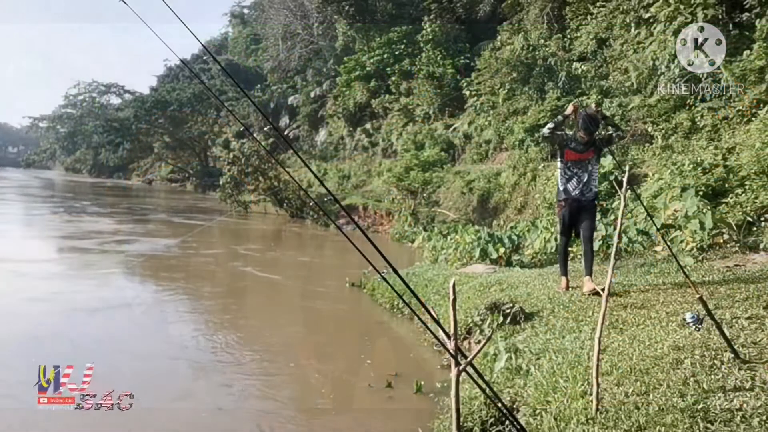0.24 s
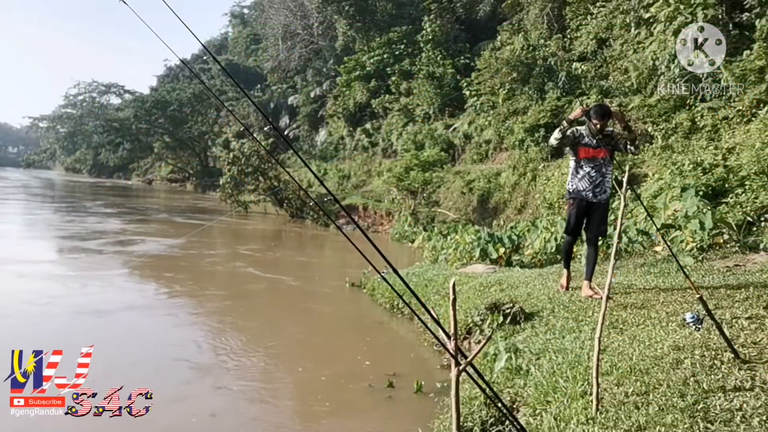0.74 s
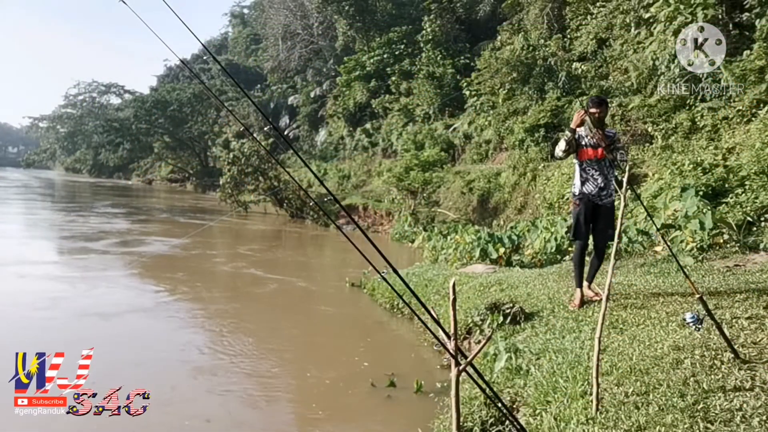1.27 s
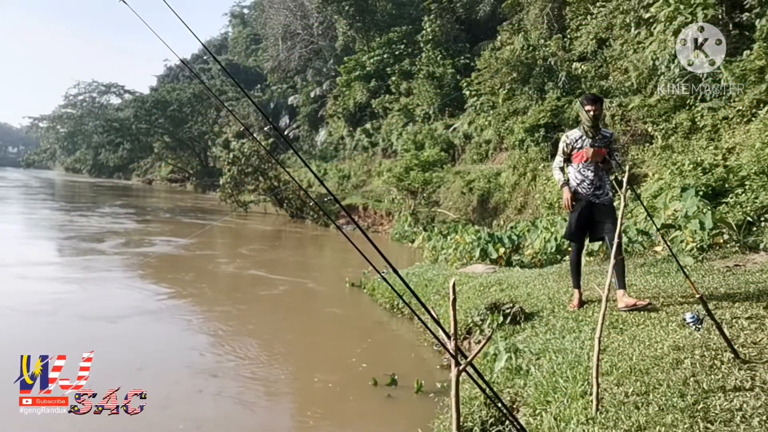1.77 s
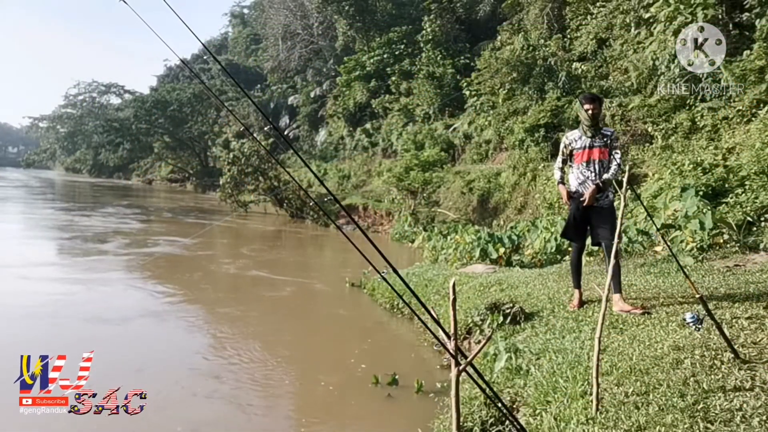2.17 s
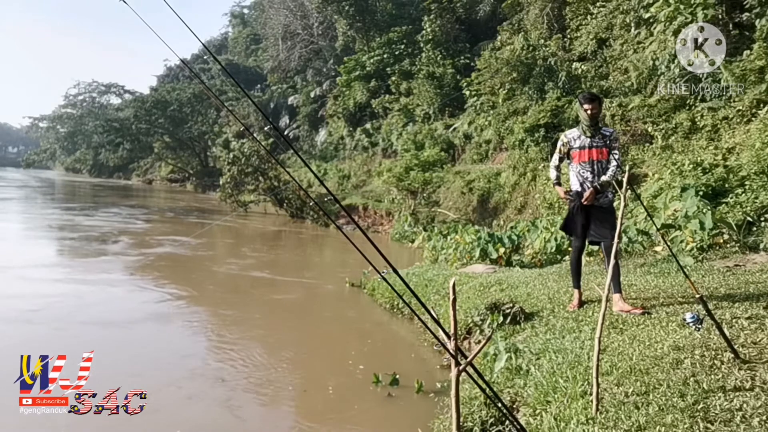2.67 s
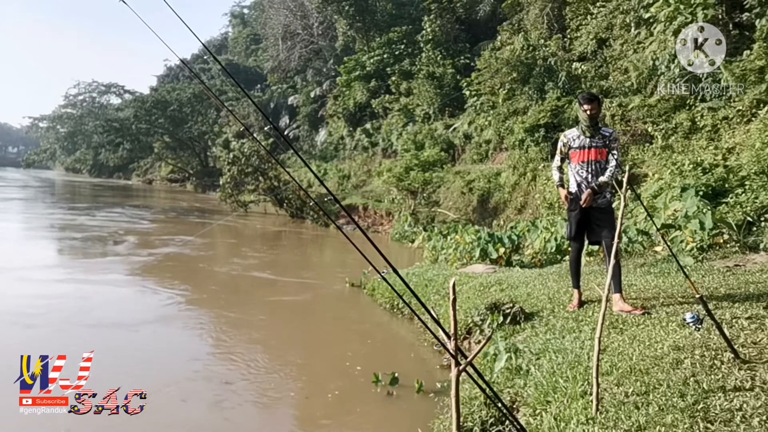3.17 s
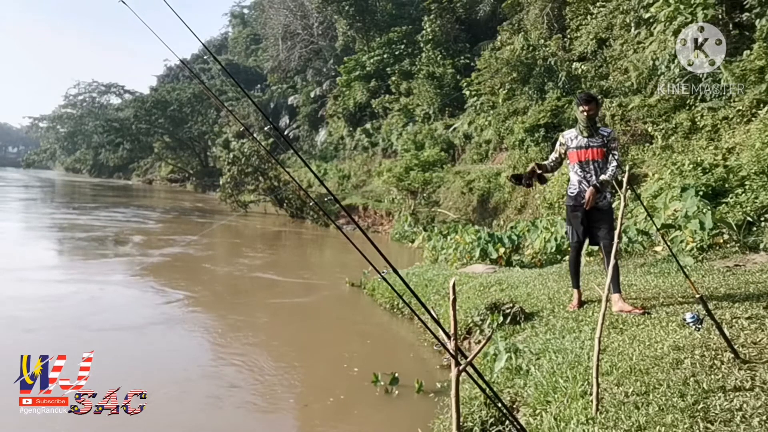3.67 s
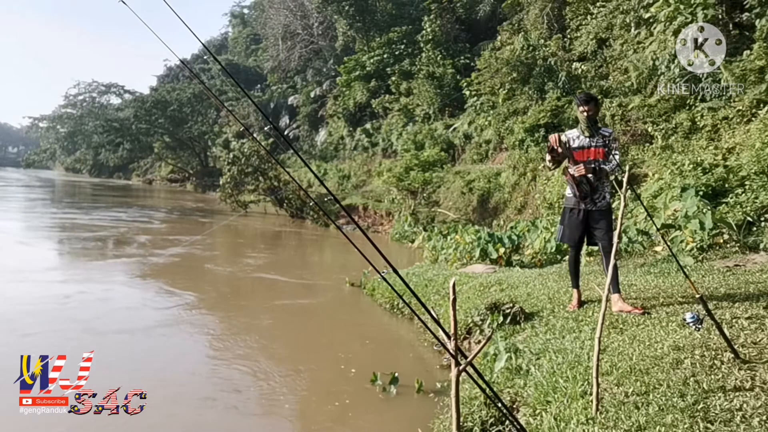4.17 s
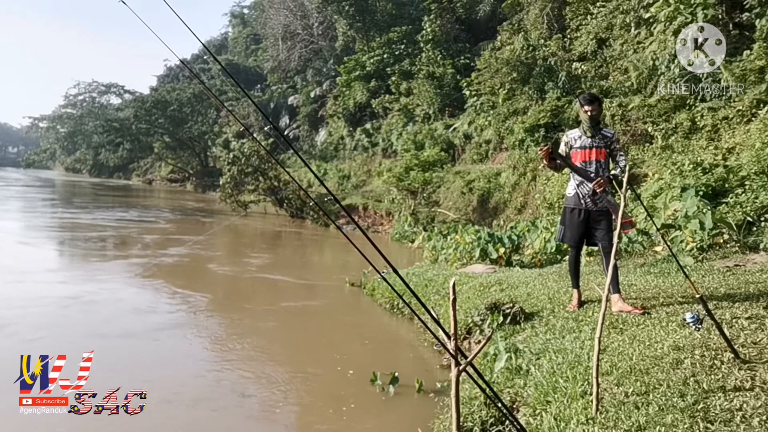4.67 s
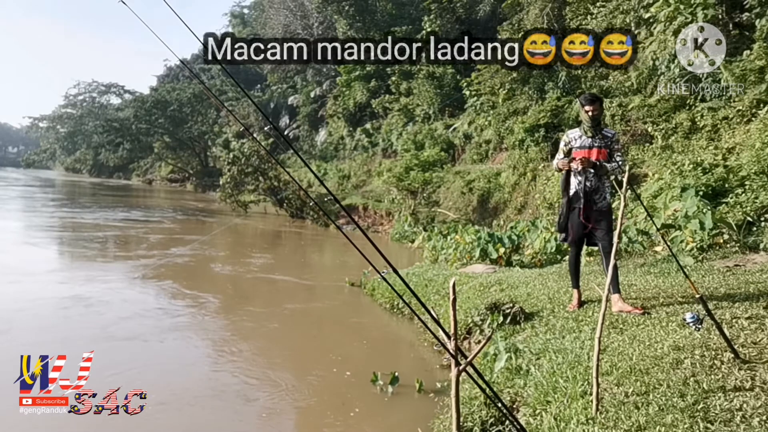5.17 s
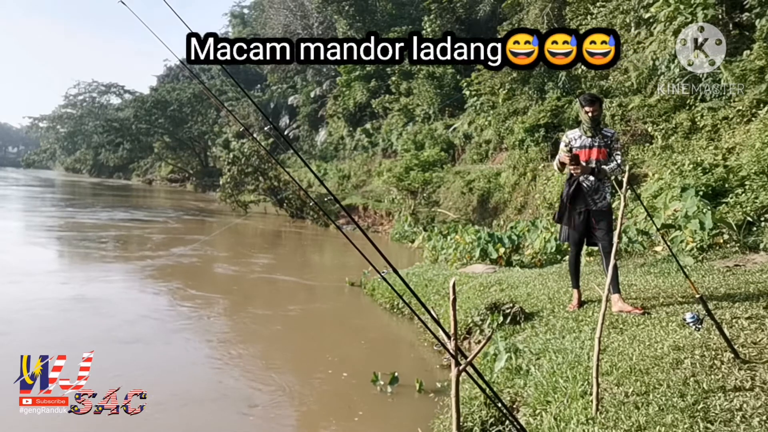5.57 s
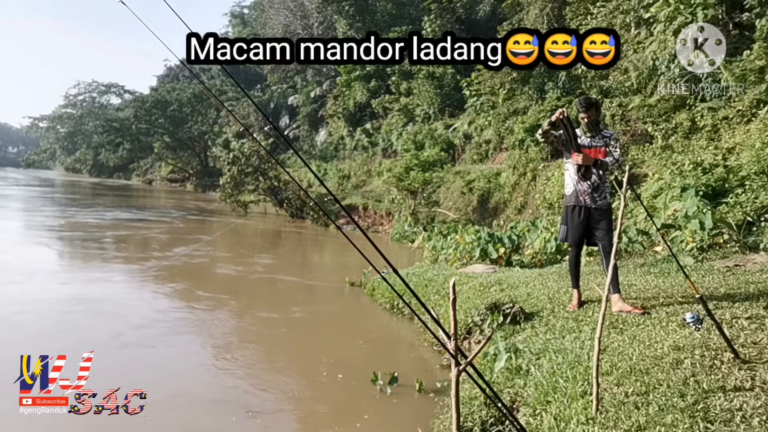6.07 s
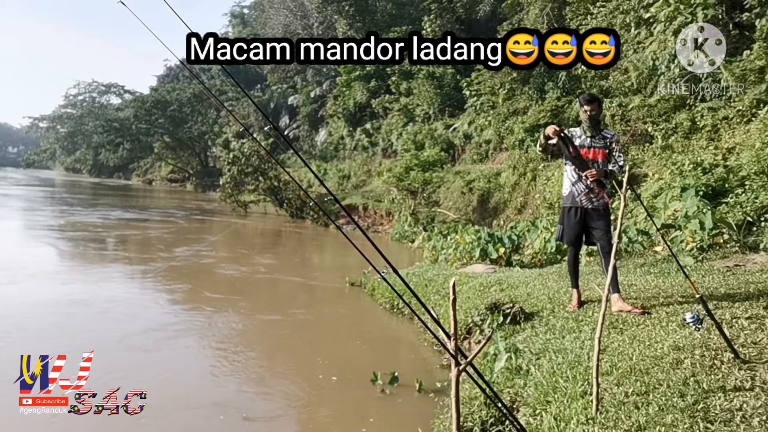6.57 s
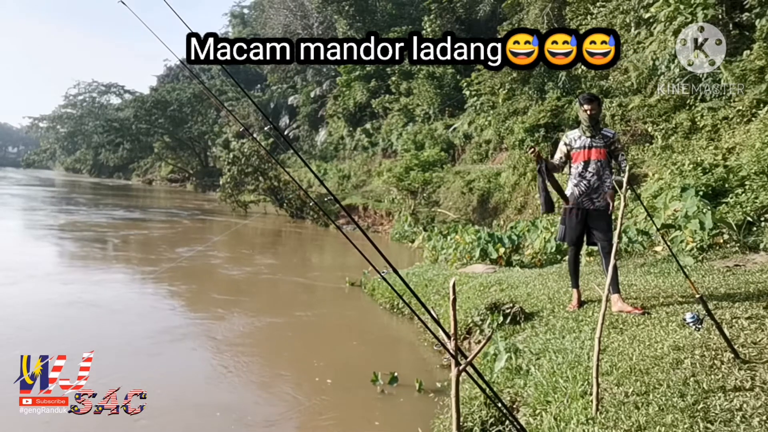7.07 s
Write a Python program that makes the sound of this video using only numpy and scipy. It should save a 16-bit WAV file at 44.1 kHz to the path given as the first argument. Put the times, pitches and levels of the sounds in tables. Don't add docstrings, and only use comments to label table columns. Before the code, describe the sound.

Outdoors on a wooded river bank, hundreds of cicadas make a continuous bright, flickering hiss, with one nearer buzzer and small regular ticks on the right. A distant engine drones low and unsteadily on the left over rumble and soft water wash. Faint hoots come early; a small bird gives a rapid falling trill near three seconds and again at the end. Wide stereo, quick fade-in.

```python
import sys
import numpy as np
from scipy import signal
from scipy.fft import rfft, irfft, next_fast_len
from scipy.io import wavfile
from scipy.ndimage import uniform_filter1d

SR = 44100
rng = np.random.default_rng(int(sys.argv[2]) if len(sys.argv) > 2 else 0)


def dump(signal):
    limited = np.clip(np.atleast_2d(signal).T, -1, 1)
    pcm = np.round(limited * 32767).astype(np.int16)
    wavfile.write(sys.argv[1], SR, pcm)


def gain_from_db(level_db):
    decades = np.asarray(level_db, float) / 20
    return 10 ** decades


N = 322812
TIME = np.arange(N) / SR

# frequency in Hz, density in dB per Hz.
CHORUS_SPECTRUM = [(5200, -38), (5600, -29.5), (5900, -16.5), (6200, -7), (6500, -4), (6900, -4.5),
                   (7300, -3), (7800, 0.5), (8100, -13), (8500, -14), (8950, -19.5), (9300, -21.5),
                   (10000, -25), (11200, -37.5)]
OVERTONE_SPECTRUM = [(11200, -31), (12200, -5), (12700, -8), (13400, 0), (14300, -8), (15000, -11),
                     (15600, -6)]
WATER_SPECTRUM = [(150, -15), (220, -2.5), (320, -6), (700, -9.5), (1800, -15), (2800, -17), (3030, -17),
                  (3350, -20), (4250, -16.5), (4480, -10.5), (4800, -13), (5150, -19.5), (5700, -19.5),
                  (6500, -50)]
RUMBLE_SPECTRUM = [(20, -15.5), (40, -1.5), (65, -5.5), (100, 4.5), (140, 5.5), (190, -6.5), (260, -21),
                   (400, -31.5), (600, -53)]
TYRE_SPECTRUM = [(280, -36), (350, -1.5), (520, -2), (750, -7), (1000, -10.5), (1500, -13), (2200, -20.5)]
# frequency in Hz, left-right likeness from 0 to 1.
LIKENESS = [(25, .8), (60, .93), (200, .8), (500, .4), (1200, .25), (3000, .1), (7000, .1), (14000, .03)]
# frequency in Hz, left minus right in dB.
BALANCE_DB = [(60, 1), (250, 2), (1000, 1), (3000, .5), (4500, -1.5), (6400, -4), (8000, -4.5), (9500, -3),
              (13000, -9.5)]
# time in seconds, rate in Hz.
ENGINE_RATE = [(0, 42.1), (.55, 43), (1.35, 45.86), (1.75, 40.46), (1.95, 44.4), (2.2, 41.8), (2.57, 39.27),
               (2.95, 40.46), (3.42, 40.24), (3.65, 42), (3.85, 39.57), (4.05, 41), (4.35, 37.96),
               (4.8, 42.23), (5.15, 39.8), (5.9, 42.73), (6.8, 38.88), (7.1, 41.94)]
# start in seconds, length in seconds, level in dB.
ENGINE_BOOMS = [(0, 0.052, -50.5), (.24, 0.08, -52), (.48, 0.83, -45.5), (1.5, 0.16, -50.5),
                (1.72, .15, -45.5), (1.93, .25, -48.5), (2.3, 0.193, -50.5), (2.55, .38, -40.5),
                (3.07, .35, -41), (3.6, 0.1203, -43.5), (3.79, 0.11, -39.5), (3.99, 0.13, -47),
                (4.23, 0.26, -40), (4.5, 0.105, -48.5), (4.79, .19, -45), (5.03, .17, -46),
                (5.4, 0.25, -51.5), (5.69, 0.73, -47), (6.68, .22, -54), (7.03, 0.28, -49.5)]
# start in seconds, length in seconds, change in dB.
ENGINE_DROPOUTS = [
    (.52, 0.31, -7),
    (1.5, 0.13, -30),
    (1.77, 0.037, -12),
    (2.48, 0.26, -11),
    (3.6, 0.071, -2),
    (3.9, 0.056, -8),
    (4.14, 0.32, -7),
    (5.05, 0.17, -4),
]
# start in seconds, length in seconds, level in dB.
ENGINE_GUSTS = [
    (2.2, .3, -79),
    (2.6, .35, -60),
    (3.1, 0.31, -52),
    (3.75, .3, -53.5),
    (4.4, 0.32, -56.5),
    (5.0, .3, -65),
    (5.55, 0.28, -58.5),
    (6.45, 0.5, -56),
]
# first centre in seconds, bursts, spacing in seconds, level in dB.
BUSH_HIGH_RUNS = [
    (.035, 2, .4, -68),
    (1.02, 8, .233, -67),
    (2.934, 2, .26, -64.5),
    (3.895, 7, .229, -66.5),
    (6.41, 5, .22, -68),
]
# first centre in seconds, bursts, spacing in seconds, level in dB.
BUSH_LOW_RUNS = [
    (1.5, 7, .203, -61),
]
# start in seconds, length in seconds, level at the end in dB.
CRICKET_BOUTS = [
    (.1, 0.65, -71.5),
    (1.4, 0.31, -71),
    (1.75, .7, -68.5),
    (2.45, 0.74, -69),
    (4.2, 0.31, -72),
    (4.5, 0.69, -69.5),
    (6.0, 0.27, -81),
    (6.35, 0.29, -70),
    (6.9, .3, -84),
]
# time in seconds, level in dB.
TICKS = [(0.132, -44), (0.328, -45), (0.551, -40), (0.798, -38.5), (1.013, -41), (1.259, -41), (1.506, -38),
         (1.8, -41), (2.042, -40), (2.262, -40.5), (2.49, -44), (2.683, -41), (2.867, -42), (3.1, -36),
         (3.341, -38), (3.611, -45), (3.801, -38.5), (4.04, -39), (4.244, -39), (4.761, -39), (5.002, -41),
         (5.204, -44), (5.407, -38.5), (5.632, -38.5), (6.107, -41), (6.304, -40.5), (6.501, -42.5),
         (6.716, -39), (6.938, -40), (7.152, -40.5)]
# time of the peak in seconds, level in dB.
RASPS = [
    (0.87, -65.5),
    (1.646, -67),
    (2.378, -64),
    (3.132, -65),
    (3.932, -68),
    (5.133, -69),
    (6.249, -66.5),
    (7.118, -63.5),
]
# centre in seconds, level in dB, pitch in Hz.
HOOTS = [(1.179, -64.5, 463), (1.396, -63.5, 423), (1.568, -74, 423), (1.78, -65.5, 389), (1.872, -63, 396),
         (1.967, -61, 393), (2.137, -60.5, 390.0), (2.387, -62, 395), (2.607, -66, 391.4),
         (2.878, -65, 377), (3.011, -70, 392.7), (3.188, -72, 391.2), (4.36, -72, 412), (5.971, -69, 423.7)]
# time in seconds, level in dB, fall in dB per second.
PASSES = [
    (1.45, -64.5, 25),
    (2.4, -70.5, 16),
    (6.15, -76, 27),
]
# time in seconds, level in dB, top in Hz, bottom in Hz.
BIRD_NOTES = [
    (2.655, -60, 2700, 1800),
    (2.931, -51.5, 2750, 1910),
    (3.064, -47.5, 2880, 1891),
    (3.184, -51.5, 2900, 1844),
    (3.319, -48, 2900, 1910),
    (3.446, -47.5, 2900, 2004),
    (6.578, -57.5, 2850, 2007),
    (6.909, -56, 2750, 1825),
    (7.059, -50, 2750, 1900),
    (7.203, -49.5, 2800, 1932),
]
# delay in seconds, left in dB, right in dB.
TRUNK_ECHOES = [
    (.005, -4, -11),
    (.026, -13.5, -11),
    (.049, -29, -16),
    (0.102, -13, -19),
]

FADE_S, FADE_DB = 0.64, -7.5
EDGE_S = .04
CHORUS_DB, OVERTONE_DB, WATER_DB, RUMBLE_DB = -51, -83.5, -67, -54
FIRST_RE_SECOND_DB, SECOND_DB, IDLE_THIRD_DB, IDLE_FOURTH_DB, FIFTH_DB = -49, -52.5, -60.5, -70.5, -71.5
BUZZER_DB, BUZZER_SAG_DB_PER_S = -57, -0.27
WHINE_HZ, WHINE_DB = 3045, -82
BUSH_HIGH_HZ, BUSH_LOW_HZ, WARM_UP_DB = 8655, 8230, -4
BOUT_SWELL_DB, CRICKET_REST_DB = 8, -80
TICK_HZ, TICK_SPREAD_HZ = 7390, 18
RASP_S, RASP_LOW_HZ, RASP_HIGH_HZ, RASP_SWELL_DB = .12, 4800, 5080, 3
DRIP_S, DRIP_DB, DRIP_HZ = 2.147, -61.5, 1360
LEAVES_S, LEAVES_DB, LEAVES_RISE_DB_PER_S, LEAVES_FALL_DB_PER_S = 4.87, -65.5, 45, 250


def rms_one(x):
    return x / np.sqrt(np.mean(x ** 2) + 1e-20)


def at_hz(points, hz):
    point_hz, value = np.transpose(points)
    return np.interp(np.log(hz), np.log(point_hz), value)


def drift(rate_hz):
    step = 40
    r = np.exp(-2 * np.pi * rate_hz * step / SR)
    chance = rng.standard_normal(N // step + 2002)
    slow = signal.lfilter([1], [1, -2 * r, r * r], chance)[2000:]
    return np.interp(np.arange(N) / step, np.arange(len(slow)), rms_one(slow))


def phase(hz):
    return 2 * np.pi * np.cumsum(hz) / SR


def resonate(x, hz, width_hz):
    r = np.exp(-np.pi * width_hz / SR)
    zeros = [(1 - r * r) / 2, 0, (r * r - 1) / 2]
    poles = [1, -2 * r * np.cos(2 * np.pi * hz / SR), r * r]
    return signal.lfilter(zeros, poles, x + 1e-18)


def held(rows, rest_db, swell_db=0):
    t = TIME[::64]
    out = np.full(len(t), float(rest_db))
    for s, length, level_db in rows:
        on = np.interp(t - s, [-EDGE_S, 0, length, length + EDGE_S], [0, 1, 1, 0])
        still_to_swell = swell_db * np.clip(1 - (t - s) / length, 0, 1)
        raised = out + on * (level_db - rest_db - still_to_swell)
        out = np.where(on > 0, np.minimum(raised, max(level_db, rest_db)), out)
    return np.interp(TIME, t, out)


def fade_db():
    return FADE_DB * np.clip(1 - TIME / FADE_S, 0, 1)


def pulses(per_s, sharp, wander):
    return (.5 - .5 * np.cos(phase(per_s * (1 + wander * drift(2.2))))) ** sharp


def bursts(rows, length_s, wobble_hz, rise_hz):
    out = np.zeros(N)
    tremble = np.cumsum(wobble_hz * drift(61.4)) / SR
    for s, level_db, hz in rows:
        first = max(round((s - length_s / 2) * SR), 0)
        span = slice(first, round((s + length_s / 2) * SR))
        age = TIME[span] - s
        turn = hz * age + rise_hz * age ** 2 / (2 * length_s) + tremble[span]
        swell = np.cos(np.pi * age / length_s) ** 2
        out[span] += gain_from_db(level_db + 3) * swell * np.sin(2 * np.pi * turn)
    return out


def runs(rows, hz, spread_hz):
    out = []
    for s, many, gap_s, level_db in rows:
        for k in range(round(many)):
            out.append((s + k * gap_s, level_db + WARM_UP_DB / (1 + k) ** 2, hz))
    return np.array(out) + rng.standard_normal((len(out), 3)) * [.008, .7, spread_hz]


def place(x, pan_db, lag, wet_db, t60):
    age = np.arange(int(.35 * SR)) / SR
    sparse = rng.random((2, len(age))) < .02
    echoes = rng.standard_normal((2, len(age))) * gain_from_db(-60 * age / t60) * sparse * (age > .004)
    echoes = echoes / np.sqrt(np.sum(echoes ** 2, axis=1))[:, None]
    direct = np.array([x, np.interp(np.arange(N) - lag, np.arange(N), x)])
    wet = signal.oaconvolve(x[None], echoes, axes=1)[:, :N]
    return (direct + gain_from_db(wet_db) * wet) * gain_from_db(pan_db * np.array([[.5], [-.5]]))


def crowd(spectrum, count, patchy_db, rate_hz, lag):
    size = next_fast_len(N)
    hz = np.arange(1, size // 2 + 2) * SR / size
    low_hz, high_hz = spectrum[0][0], spectrum[-1][0]
    alike = np.clip(at_hz(LIKENESS, hz), 0, 1)
    shared, left, right = rfft(rng.standard_normal((3, size)))
    own = np.sqrt(1 - alike) * np.array([left, right])
    delay = np.array([hz ** 0, np.exp(-2j * np.pi * hz * lag / SR)])
    common = np.sqrt(alike) * shared * delay
    tilt = gain_from_db(at_hz(BALANCE_DB, hz) * np.array([[.5], [-.5]]))
    inside = (hz > low_hz) & (hz < high_hz)
    coloured = (own + common) * tilt * gain_from_db(at_hz(spectrum, hz)) * inside
    position = np.interp(np.log(hz), np.log([low_hz, high_hz]), [0, count - 1])
    out = np.zeros((2, N))
    for k in range(count):
        band = irfft(coloured * np.clip(1 - abs(position - k), 0, 1), size)[:, :N]
        out += band * gain_from_db(patchy_db * drift(rate_hz))
    return out / np.sqrt(np.mean(out.mean(axis=0) ** 2))


def cicada_chorus():
    voices = gain_from_db(CHORUS_DB) * crowd(CHORUS_SPECTRUM, count=5, patchy_db=0.97, rate_hz=97, lag=-30)
    overtone = gain_from_db(OVERTONE_DB) * crowd(OVERTONE_SPECTRUM, count=2, patchy_db=1.3, rate_hz=14, lag=-10)
    return gain_from_db(fade_db()) * (voices + overtone)


def water():
    return gain_from_db(WATER_DB + fade_db()) * crowd(WATER_SPECTRUM, count=4, patchy_db=.9, rate_hz=4.3, lag=15)


def rumble():
    return gain_from_db(RUMBLE_DB + fade_db()) * crowd(RUMBLE_SPECTRUM, count=2, patchy_db=0.0, rate_hz=1.9, lag=35)


def engine():
    rate_s, rate_hz = np.transpose(ENGINE_RATE)
    turn = phase(np.interp(TIME, rate_s, rate_hz))
    second_db = SECOND_DB + fade_db() + held(ENGINE_DROPOUTS, 0)
    third_db = held(ENGINE_BOOMS, IDLE_THIRD_DB, swell_db=1.5)
    fourth_db = held(ENGINE_GUSTS, IDLE_FOURTH_DB)
    orders_db = [second_db + FIRST_RE_SECOND_DB, second_db, third_db, fourth_db, FIFTH_DB]
    out = np.zeros(N)
    for order, level_db in enumerate(orders_db, 1):
        shiver = gain_from_db(level_db + 2.5 + 1.4 * drift(10))
        out += shiver * np.sin(order * turn + 0.23 * drift(8.9))
    return out


def buzzer():
    strokes = pulses(108.0, sharp=1.6, wander=0.001)
    weak = 0.15 * np.roll(strokes, round(SR / 216))
    puffs = (strokes + weak) * rng.standard_normal(N)
    body = resonate(resonate(puffs, 7440, 550), 7807, 380)
    level_db = BUZZER_DB + BUZZER_SAG_DB_PER_S * TIME + fade_db() + 0.57 * drift(6.6)
    return gain_from_db(level_db) * rms_one(body)


def whine():
    thin = resonate(resonate(rng.standard_normal((2, N)), WHINE_HZ, 90), WHINE_HZ, 90)
    return gain_from_db(WHINE_DB + fade_db() + 2.1 * drift(2.6)) * rms_one(thin)


def bush_crickets():
    upper = runs(BUSH_HIGH_RUNS, BUSH_HIGH_HZ, spread_hz=12)
    both_modes = np.vstack([upper, upper - [0, 6, 230]])
    high = bursts(both_modes, length_s=0.19, wobble_hz=35, rise_hz=0)
    high = high * pulses(65, sharp=0.37, wander=0.021)
    lower = runs(BUSH_LOW_RUNS, BUSH_LOW_HZ, spread_hz=22)
    low = bursts(lower, length_s=0.32, wobble_hz=58.6, rise_hz=0)
    low = low * pulses(76, sharp=1.2, wander=0.021)
    return gain_from_db(10) * high + gain_from_db(3.5) * low


def cricket():
    turn = phase(18.6 * (1 + 0.024 * drift(1.0)))
    chirp = 0.2 + (.5 - .5 * np.cos(turn)) ** 0.77
    strokes = 0.57 + (.5 + .5 * np.cos(3 * turn - 3 * np.pi)) ** 1.1
    tone = np.sin(phase(4670 + 25 * drift(25.4)))
    blur = rms_one(resonate(resonate(rng.standard_normal(N), 4740, 170), 4660, 180))
    level_db = held(CRICKET_BOUTS, CRICKET_REST_DB, BOUT_SWELL_DB) - 2 + 1.2 * drift(12)
    return gain_from_db(level_db) * rms_one(chirp * strokes * (tone + .5 * blur))


def ticker():
    rows = np.c_[TICKS, TICK_HZ + TICK_SPREAD_HZ * rng.standard_normal(len(TICKS))]
    return gain_from_db(-6) * bursts(rows, length_s=.014, wobble_hz=40, rise_hz=500)


def rasps():
    teeth = (.45 + pulses(85, sharp=2.0, wander=.08)) * rng.standard_normal(N)
    t = TIME[::64]
    swell = sum(gain_from_db(level_db) * np.interp(t - s, [-.09, 0, .04], [0, 1, 0]) for s, level_db in RASPS)
    out = np.zeros(N)
    for climb in np.arange(4) / 3:
        hz = RASP_LOW_HZ + climb * (RASP_HIGH_HZ - RASP_LOW_HZ)
        late = np.interp(TIME - RASP_S * (climb - .75), t, swell)
        band = rms_one(resonate(resonate(teeth, hz, 300), hz, 280))
        out += late * gain_from_db(-RASP_SWELL_DB * (1 - climb)) * band
    return gain_from_db(-3.5) * out


def hooting_bird():
    return gain_from_db(-2) * bursts(HOOTS, length_s=0.088, wobble_hz=11, rise_hz=-11)


def traffic():
    swell = sum(gain_from_db(level_db - fall * abs(TIME - s)) for s, level_db, fall in PASSES)
    return swell * crowd(TYRE_SPECTRUM, count=3, patchy_db=3.0, rate_hz=1.9, lag=8.7)


def drip():
    puff = gain_from_db(DRIP_DB) * np.interp(TIME - DRIP_S, [-.006, 0, .014], [0, 1, 0])
    return puff * rms_one(resonate(resonate(rng.standard_normal(N), DRIP_HZ, 700), DRIP_HZ, 700))


def trilling_bird():
    out = np.zeros(N)
    rough_hz, flutter = 75 * drift(200), gain_from_db(3.2 * drift(130))
    for s, level_db, top_hz, bottom_hz in BIRD_NOTES:
        span = slice(round((s - .03) * SR), round((s + .04) * SR))
        age = TIME[span] - s
        swing = np.interp(age, [-.02, -.011, -.006, 0, .009, .015, .028], [.45, .97, .85, .52, .1, 0, .3])
        swing = uniform_filter1d(swing, size=90)
        pitch_hz = bottom_hz + (top_hz - bottom_hz) * swing + rough_hz[span]
        shape = np.interp(age, [-.022, -.016, -.006, 0, .006, .016, .032], [0, .35, .55, 1, .5, .5, 0])
        out[span] += gain_from_db(level_db + 0.5) * shape * flutter[span] * np.sin(phase(pitch_hz))
    near = place(out, pan_db=2.2, lag=17, wet_db=-8, t60=.45)
    echoed = near.copy()
    for s, left_db, right_db in TRUNK_ECHOES:
        echoed += np.roll(near, round(s * SR), axis=1) * gain_from_db([[left_db], [right_db]])
    return echoed


def leaves():
    rise_db = LEAVES_RISE_DB_PER_S * (TIME - LEAVES_S)
    fall_db = LEAVES_FALL_DB_PER_S * (LEAVES_S - TIME)
    rustle = resonate(resonate(rng.standard_normal((2, N)), 3450, 1300), 3400, 1400)
    return gain_from_db(LEAVES_DB + np.minimum(rise_db, fall_db)) * rms_one(rustle)


def scene():
    wide = cicada_chorus() + water() + rumble() + traffic()
    motor = place(engine(), pan_db=1.6, lag=9, wet_db=-17, t60=.2)
    insects = place(buzzer(), pan_db=-12, lag=-30.5, wet_db=-2.0, t60=0.15)
    insects += place(bush_crickets(), pan_db=-6.0, lag=-11.5, wet_db=-5.5, t60=0.26)
    insects += place(cricket() + rasps(), pan_db=-2.5, lag=-19, wet_db=-6, t60=.25)
    insects += place(ticker(), pan_db=-6.5, lag=-30, wet_db=-7, t60=.12)
    birds = place(hooting_bird(), pan_db=4, lag=7, wet_db=2, t60=.45) + trilling_bird()
    return wide + motor + insects + whine() + birds + drip() + leaves()


def top_cut(x):
    return signal.sosfilt(signal.butter(12, 15150, fs=SR, output="sos"), x)


def record(dry):
    mix = dry - .0003
    return top_cut(mix)


dry = scene()
out = record(dry)
dump(out)
```